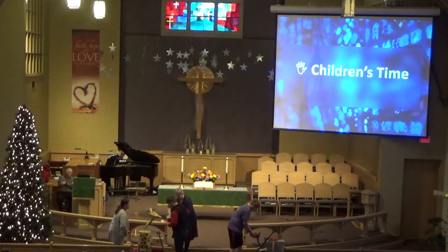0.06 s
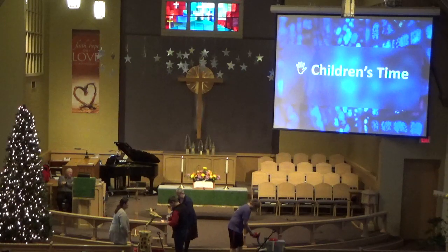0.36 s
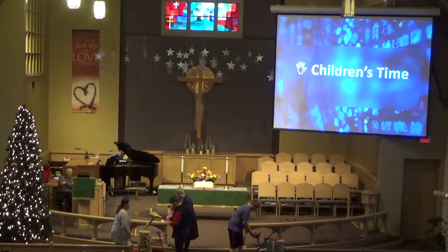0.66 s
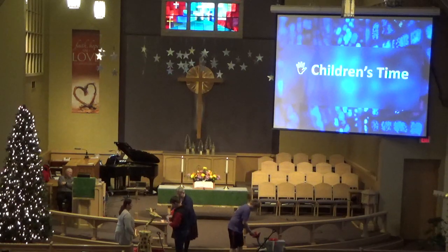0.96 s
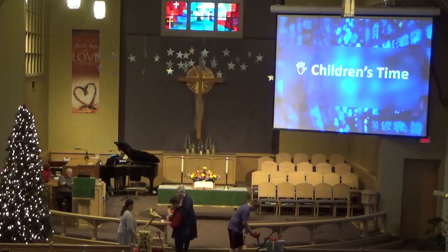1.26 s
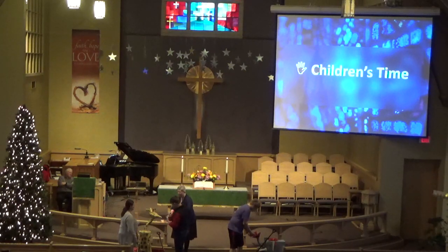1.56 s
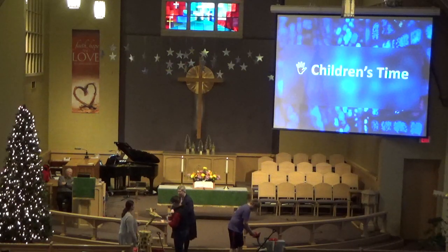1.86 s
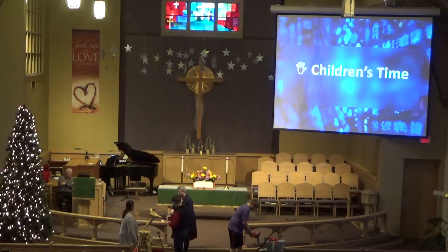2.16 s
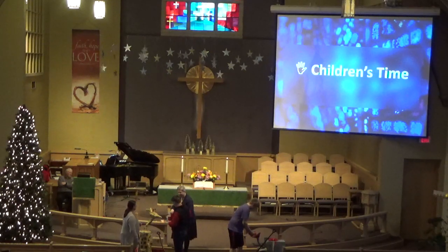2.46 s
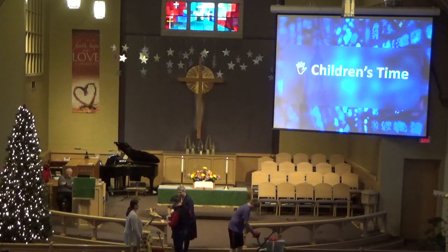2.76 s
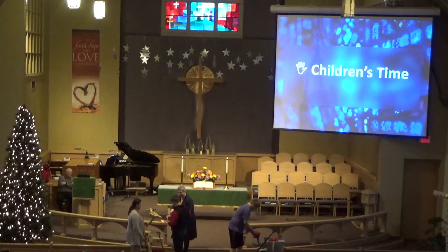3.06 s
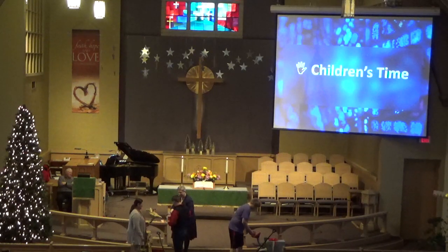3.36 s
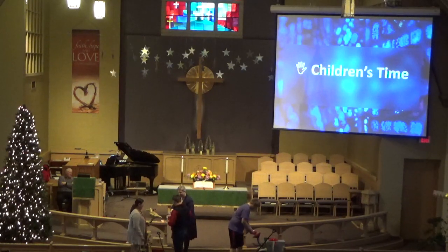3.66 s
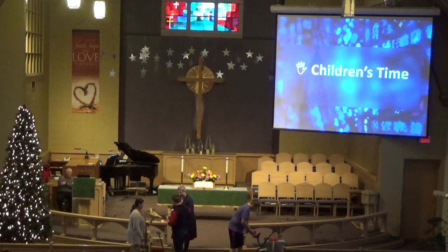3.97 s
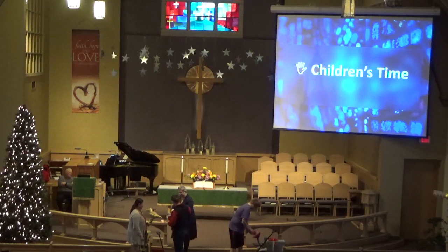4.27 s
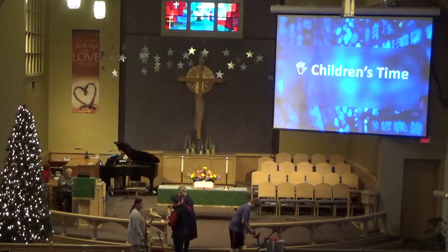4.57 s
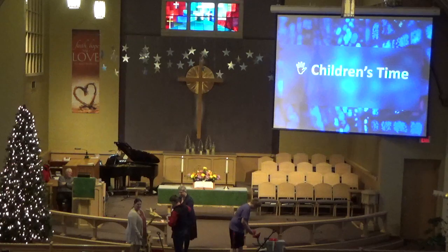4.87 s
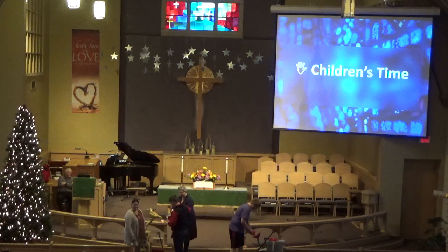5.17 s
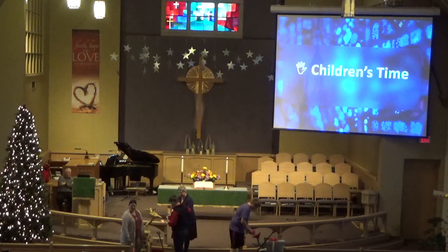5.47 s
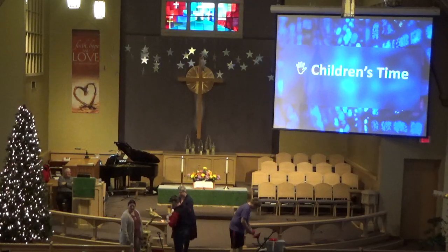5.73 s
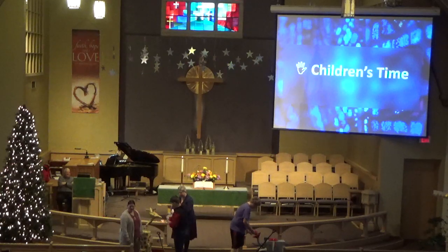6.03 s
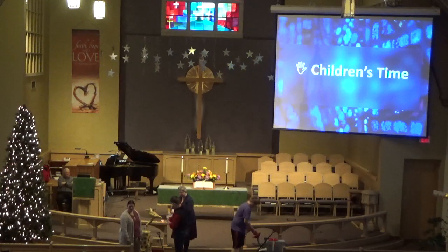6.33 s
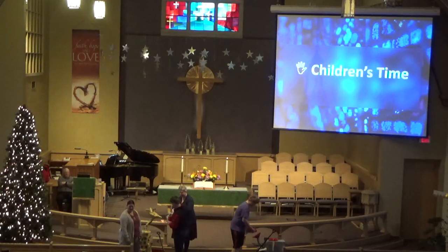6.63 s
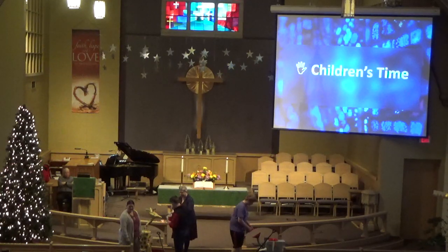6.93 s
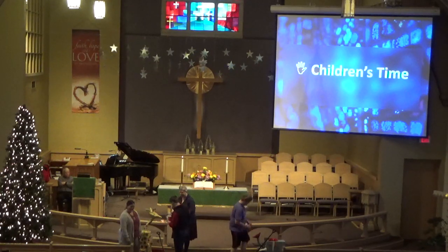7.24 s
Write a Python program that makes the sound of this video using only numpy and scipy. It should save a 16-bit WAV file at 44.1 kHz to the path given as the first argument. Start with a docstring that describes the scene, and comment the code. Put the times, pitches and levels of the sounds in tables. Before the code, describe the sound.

In a large, echoing church hall, coins are swirled in a tin and tossed into collection cups some way from the microphone. A few light clinks grow into busy, irregular bursts of jingling and hollow rattling, then thin out and stop near the end. Close up, electrical interference runs throughout as rapid, even ticking and a stuttering, whiny buzz over faint room hum.

```python
"""Coins in a reverberant hall

Some way off, coins are swirled in a tin and tossed into collection cups. Each impact excites the
normal modes of the tin, the cup walls or the coins, and reverberation blurs the impacts into bursts.
Close by, electrical interference ticks 16 times a second and buzzes in stutters. It is almost mono."""
import sys
import numpy as np
from scipy import signal
from scipy.fft import rfft, irfft
from scipy.io import wavfile
from scipy.ndimage import uniform_filter1d

SR = 44100
rng = np.random.default_rng(int(sys.argv[2]) if len(sys.argv) > 2 else 0)


def materialize(psi):
    """Save the field psi as 16-bit PCM at rate SR to the path in sys.argv[1].

    A 1-D psi becomes a single channel; in a 2-D psi each row is a channel.
    """
    bounded = np.clip(np.atleast_2d(psi).T, -1, 1)
    quanta = np.round(bounded * 32767).astype(np.int16)
    wavfile.write(sys.argv[1], SR, quanta)


N = 321930
TIME = np.arange(N) / SR

# normal modes of the vessels: (frequency [Hz], bandwidth [Hz], peak over the contact click [dB])
TIN_MODES = [(937, 200, 6), (1481, 136, 14.5), (1594, 250, 3.5), (1950, 270, 3.5), (3834, 170, 5.5),
             (4100, 280, 8), (4794, 150, 2), (5530, 140, -8), (7140, 2100, 2)]
CUP_MODES = [(668, 106, -2), (862, 175, 2), (1049, 216, 5.5), (1222, 270, 3), (1455, 220, 2.5),
             (2540, 130, -2), (3010, 1200, -0.5), (9780, 660, 2)]
# spectra of the contact clicks: (frequency [Hz], relative spectral level [dB])
TIN_CLICK = [(25, -46), (100, -24), (330, -9), (550, -2), (1200, -9.5), (1700, -0.5), (3200, 0.5),
             (4600, 1.5), (6300, -2.5), (8000, -5.5), (9600, -7.5), (11000, -17)]
CUP_CLICK = [(25, -50), (70, -23), (140, -18), (250, -8), (450, -1), (800, 1), (1500, 1), (2200, 1),
             (3400, 2.5), (4100, -1), (5500, -2.5), (8000, -4), (9200, -3.5), (11000, -7.5)]
COIN_CLICK = [(25, -60), (200, -25), (1200, -14.5), (2300, -6.5), (3200, -3.5), (3800, -0.5), (4500, 0.5),
              (5900, 2), (8000, -1.5), (11000, -2)]
# swirls of the coins round the tin: (start [s], duration [s], level [dB])
SWIRLS = [(-0.035, 0.038, -47.5), (0.22, 0.081, -60), (0.473, 0.186, -52.7), (1.093, 0.21, -39),
          (1.348, 0.275, -38.5), (1.66, 0.5, -39.5), (2.242, 0.24, -45), (2.965, 0.165, -38.5),
          (3.091, 0.386, -39.5), (3.738, 0.17, -40.0), (4.039, 0.12, -42.5), (4.265, 0.114, -42.5),
          (4.57, 0.069, -45.5), (4.814, 0.13, -39.5), (4.972, 0.052, -44.8), (5.346, 0.16, -48.0),
          (5.851, 0.14, -48)]
# handfuls tossed into a cup: (start [s], duration [s], coin on coin [dB], coin on cup [dB])
TOSSES = [(0.14, 0.039, -47.0, -52), (0.35, 0.056, -57, -50.5), (0.5, 0.104, -54, -61.7),
          (0.826, 0.03, -43.5, -60.5), (0.983, 0.15, -53.0, -69), (1.125, 0.28, -47.5, -54),
          (1.358, 0.2, -33.5, -33.5), (1.544, 0.13, -44, -35.0), (1.683, 0.23, -35.9, -35.5),
          (1.908, 0.24, -37, -34), (2.216, 0.076, -32.5, -33), (2.328, 0.12, -39, -34.5),
          (2.47, 0.065, -43, -41.9), (2.641, 0.039, -42.6, -42), (2.742, 0.063, -55, -44.5),
          (2.913, 0.3, -48, -55), (3.204, 0.11, -38, -41), (3.297, 0.18, -36.5, -32.5),
          (3.515, 0.16, -41, -41.5), (3.64, 0.111, -41.5, -35.0), (3.806, 0.061, -56, -44.5),
          (3.943, 0.029, -37.5, -41), (4.025, 0.06, -35, -37), (4.115, 0.065, -38, -35),
          (4.268, 0.23, -58, -48.2), (4.524, 0.048, -38.5, -36.5), (4.655, 0.08, -48, -47),
          (4.732, 0.051, -45, -49), (4.89, 0.11, -50, -50.5), (5.096, 0.116, -38.5, -36.5),
          (5.257, 0.128, -60, -42.5), (5.573, 0.02, -45, -44), (5.766, 0.023, -48, -43.5),
          (5.898, 0.17, -57.7, -66), (6.16, 0.04, -59, -41.5), (6.232, 0.03, -45, -41.5),
          (6.383, 0.048, -63, -51)]
# envelopes of the movements:
# (swell depth [dB], swell time [s], share of duration added to it [1], sag [dB/s], release [dB/s])
SWIRL_SHAPE = (5, 0.09, 0, -1, 135)
JINGLE_SHAPE = (4.6, 0.019, 0.23, 20, 380)
LANDING_SHAPE = (6.9, 0.022, .16, 3.4, 162)
# decay of the hall: (frequency [Hz], reverberation time [s])
HALL_T60 = [(125, 2.2), (500, 1.6), (2000, 1.27), (4000, 1), (10000, 0.26)]
# spectra of the air noise and the buzz's rasp: (frequency [Hz], relative spectral level [dB])
AIR_SPECTRUM = [(25, -22), (50, -37), (90, -4), (180, 1.5), (350, 0), (700, -8), (1500, -19), (4000, -12),
                (11000, -20.5)]
RASP_SPECTRUM = [(60, -20), (170, -1.5), (400, 1.5), (750, 2), (1100, 4.5), (1400, 0.5), (2000, -1),
                 (3000, -4.5), (5000, -10.5), (8000, -17), (11000, -21.5)]
# partials of the mains hum: (frequency [Hz], level [dB])
MAINS_HUM = [(60, -97), (120, -77.5), (180, -70.5)]
# partials of the whine: (harmonic number [1], level between dips [dB])
WHINE_HARMONICS = [(1, -63.5), (2, -68.5), (3, -70.5), (4, -79), (5, -83), (6, -79), (7, -87)]
# wander of the ticks about their steady beat: (time [s], delay [s])
TICK_DRIFT = [(0, .0034), (.25, 0), (.7, .0002), (1, -.002), (1.25, .0002), (2, -.0003), (2.25, .0034),
              (2.95, .0031), (3.3, .0059), (4.3, .0028), (5.1, .0033), (5.75, 0), (6.6, -.0014),
              (7.3, .0021)]
# faint stereo width: (frequency [Hz], side relative to mid [dB])
STEREO_WIDTH = [(100, -40), (1500, -53.5), (4000, -41.5), (9000, -34.5)]


def gain(db):
    """Amplitude ratio of a level in decibels."""
    return 10 ** (np.asarray(db) / 20)


def at_level(x, db):
    """Scaling to an rms level."""
    return x * gain(db) / np.sqrt(np.mean(x ** 2))


def at_hz(rows, hz):
    """Interpolation of a table on a logarithmic frequency axis."""
    points, values = np.transpose(rows)
    return np.interp(np.log(hz + 1e-3), np.log(points), values)


def coloured(x, spectrum, size=2048):
    """Minimum-phase filtering: each impulse becomes the most compact causal pulse with this spectrum."""
    cepstrum = irfft(np.log(gain(at_hz(spectrum, np.fft.rfftfreq(size, 1 / SR)))))
    cepstrum[1:size // 2] *= 2
    cepstrum[size // 2 + 1:] = 0
    pulse = irfft(np.exp(rfft(cepstrum)))
    return signal.fftconvolve(x, pulse)[:N]


def noise(spectrum):
    """Filtered Gaussian noise of unit rms."""
    return at_level(coloured(rng.standard_normal(N), spectrum), 0)


def wander(rate_hz):
    """Slow random modulation with a spread near 1."""
    hold = int(SR / rate_hz)
    steps = np.repeat(rng.standard_normal(N // hold + 1), hold)
    return np.sqrt(2) * uniform_filter1d(steps, hold)[:N]


def low_pass(x, cutoff_hz=11000):
    """An elliptic filter cuts the top octave steeply."""
    return signal.sosfilt(signal.ellip(14, .1, 80, cutoff_hz, fs=SR, output="sos"), x)


def impulses(rate_hz, scatter_db, pool=6000):
    """A random impulse train with exponentially distributed levels: many soft, a few hard."""
    moments = rng.integers(0, N, pool)
    levels_db = scatter_db * np.minimum(rng.exponential(size=pool), 3)
    amplitudes = gain(levels_db) * rng.choice([-1, 1], pool)
    happens = np.arange(pool) < rate_hz * N / SR
    return np.bincount(moments, amplitudes * happens, N)


def struck(hits, click, modes):
    """Modal superposition: each impact clicks and excites each mode as its striking point favours it."""
    sound = hits.copy()
    moments = np.flatnonzero(hits)
    for hz, width_hz, db in modes:
        drive = np.zeros(N)
        drive[moments] = hits[moments] * rng.standard_normal(N // 50)[:len(moments)]
        resonator = np.concatenate(signal.iirpeak(hz, hz / width_hz, fs=SR))
        sound += gain(db) * signal.sosfilt([resonator, resonator], drive)  # twice, for steep skirts
    return at_level(coloured(sound, click), 0)


def envelope(movements, shape):
    """Incoherent movements add in power; each swells, sags as coins spread and dies as they settle."""
    swell_db, swell_s, swell_share, sag_db_per_s, release_db_per_s = shape
    power = np.zeros(N)
    for start, length, db in movements:
        age = TIME - start
        swell_left = np.maximum(1 - age / (swell_s + swell_share * length), 0)
        fade_db = swell_db * swell_left ** 2 + release_db_per_s * np.maximum(age - length, 0)
        sag_db = sag_db_per_s * (np.clip(age, 0, length) - length / 2)
        power += gain(db - sag_db - np.minimum(fade_db, 100)) ** 2
    return np.sqrt(power)


def hall(dry, direct_db=-8, early_db=-6, tail_db=-2.0, early_s=0.075, size=49152, bands=8):
    """Reverberation: direct sound, early reflections and a diffuse tail whose treble decays first."""
    t = np.arange(size) / SR
    hz = np.fft.rfftfreq(size, 1 / SR)
    diffuse = rfft(rng.standard_normal(size))
    early_fade = np.exp(-2 * t / early_s) * np.sqrt(4 / early_s / SR)  # unit energy
    response = gain(early_db) * rng.standard_normal(size) * early_fade
    centres = np.geomspace(300, 12000, bands)
    for centre, share in zip(centres, np.eye(bands)):
        decay = np.log(1000) / at_hz(HALL_T60, centre)
        band = irfft(diffuse * np.interp(hz, centres, share))
        response += gain(tail_db) * band * np.exp(-decay * t) * np.sqrt(2 * decay / SR)
    response[0] += gain(direct_db)
    return signal.fftconvolve(dry, response)[:N]


def vessel(strength, click, modes, rate_hz, scatter_db, spots=4):
    """Incoherent radiation: each struck spot of a wall reaches the listener by its own paths."""
    patters = (struck(impulses(rate_hz / spots, scatter_db), click, modes) for _ in range(spots))
    return sum(hall(strength * patter) for patter in patters) / np.sqrt(spots)


def tin():
    """Impact excitation: dense collisions of swirling coins keep the tin's modes ringing."""
    return vessel(envelope(SWIRLS, SWIRL_SHAPE), TIN_CLICK, TIN_MODES, rate_hz=1800, scatter_db=3.5)


def background(air_db):
    """Stationary sound: broadband air noise and the harmonics of mains hum."""
    hum = sum(np.sqrt(2) * gain(db) * np.sin(2 * np.pi * (hz * TIME + rng.random()))
              for hz, db in MAINS_HUM)
    return hum + gain(air_db) * noise(AIR_SPECTRUM)


def buzz(pitch_hz, jitter_rad, rasp_db, surge_db, dip_hz, dip_s, depth_db, uneven_db):
    """Amplitude modulation: brief dips chop an electrical whine and its rasp into uneven stutters."""
    # dips fall due at a steady rate but wait for the nearest block edge, so the rhythm limps
    first_due_s, first_edge_s, block_s = .022, .005, .016
    due = np.arange(first_due_s, N / SR, 1 / dip_hz)
    moments = first_edge_s + block_s * np.round((due - first_edge_s) / block_s)
    depth_spread, surge = rng.standard_normal((len(moments) + 1, 2)).T
    depths_db = np.minimum(depth_db + uneven_db * depth_spread[:-1], 0)
    dips = np.bincount((moments * SR).astype(int), depths_db, N)[:N]
    dip_db = signal.fftconvolve(dips, signal.windows.tukey(int(dip_s * SR), .5), "same")
    phase = 2 * np.pi * pitch_hz * TIME + jitter_rad * wander(60)
    whine = sum(np.sqrt(2) * gain(db) * np.sin(harmonic * phase + 2 * np.pi * rng.random())
                for harmonic, db in WHINE_HARMONICS)
    flutter_db = 2 * np.tanh(wander(70))
    stutter_db = surge_db * surge[np.searchsorted(moments, TIME)]
    rasp = gain(rasp_db + flutter_db + stutter_db) * noise(RASP_SPECTRUM)
    return (whine + rasp) * gain(dip_db)


def ticks(first_s, period_s, peak_db, scatter_db, width_s, lead_s, rebound_s):
    """A current pulse train: each swings up, then further down, and rebounds through the coupling."""
    cycles = (TIME - np.interp(TIME, *np.transpose(TICK_DRIFT)) - first_s) / period_s
    nearest = np.round(cycles).astype(int)
    t = (cycles - nearest) * period_s
    swing = 0.65 * np.exp(-((t + lead_s) / width_s) ** 2) - np.exp(-(t / width_s) ** 2)
    rebound = 0.13 * np.exp(-(2 * (t - rebound_s) / rebound_s) ** 2)
    levels_db = peak_db + scatter_db * rng.standard_normal(nearest.max() + 1)
    return (swing + rebound) * gain(levels_db[nearest])


def crackle(rate_hz, db, centre_hz):
    """Band-limited impulse noise, heard as stray dull pops among the ticks."""
    band = signal.butter(1, [centre_hz / 2, centre_hz * 2], "band", fs=SR, output="sos")
    return at_level(signal.sosfilt(np.vstack([band, band]), impulses(rate_hz, scatter_db=3.5)), db)


def clinks(rate_hz=240, scatter_db=7.5, low_hz=4450, width_hz=90, ring_db=3.5, count=6):
    """Plate vibration: coins of mixed sizes ring in inharmonic disc modes, soon damped by the heap."""
    disc_ratios = [1, 1.73, 2.33]
    fundamentals = low_hz * 2 ** ((np.arange(count) + rng.random(count)) / count)
    modes = [(min(hz, .45 * SR), width_hz, ring_db) for hz in np.outer(fundamentals, disc_ratios).flat]
    return at_level(low_pass(struck(impulses(rate_hz, scatter_db), COIN_CLICK, modes)), 0)


def coins(shifting_db, uneven_db, shifting_until_s, handfuls=4):
    """Coin-on-coin impacts add in power: loud in a toss, faint while the coins shift in the hand."""
    tossing = envelope([(start, length, db) for start, length, db, _ in TOSSES], JINGLE_SHAPE)
    shifting = gain(shifting_db + uneven_db * wander(12)) * (TIME < shifting_until_s)
    strength = np.hypot(tossing, shifting)
    return sum(hall(strength * clinks()) for _ in range(handfuls)) / np.sqrt(handfuls)


def cups(fall_s):
    """Impact excitation: after a short fall, each toss rings the modes of a cup's wall."""
    landings = [(start + fall_s, length, db) for start, length, _, db in TOSSES]
    return vessel(envelope(landings, LANDING_SHAPE), CUP_CLICK, CUP_MODES, rate_hz=1200, scatter_db=4)


def heap_damping(x, from_s, full_s, centre_hz, width_hz, full_db):
    """Contact damping: the heap that gathers in the cups weakens the upper ring of their walls."""
    fullness = np.clip((TIME - from_s) / (full_s - from_s), 0, 1)
    ring = signal.lfilter(*signal.iirpeak(centre_hz, centre_hz / width_hz, fs=SR), x)
    return x - (1 - gain(full_db * fullness)) * ring


def scene():
    """Superposition of the reverberant coin sounds, the close interference and the background."""
    money = tin()
    money += heap_damping(cups(fall_s=0.0051), from_s=4.8, full_s=5.9,
                          centre_hz=3140, width_hz=1500, full_db=-4)
    money += coins(shifting_db=-67, uneven_db=1.5, shifting_until_s=6.35)
    interference = ticks(first_s=.0074, period_s=.062787, peak_db=-38, scatter_db=1.2,
                         width_s=0.00044, lead_s=0.00089, rebound_s=0.0023)
    interference += buzz(pitch_hz=1002, jitter_rad=0.29, rasp_db=-52.5, surge_db=1.2,
                         dip_hz=24, dip_s=0.015, depth_db=-8.0, uneven_db=2)
    interference += crackle(rate_hz=30, db=-63.0, centre_hz=414)
    mid = money + interference + background(air_db=-59.5)
    # a side signal in quadrature: left and right differ only by a slight shift of phase
    width = gain(at_hz(STEREO_WIDTH, np.fft.rfftfreq(N, 1 / SR)))
    side = irfft(1j * rfft(mid) * width, N)
    return np.array([mid + side, mid - side])


def record(dry):
    """Band limiting thins the deep bass and removes the highest treble."""
    return low_pass(signal.sosfilt(signal.butter(2, 35, "high", fs=SR, output="sos"), dry))


dry = scene()
out = record(dry)
materialize(out)
```